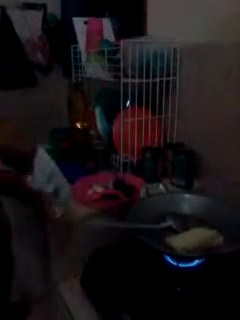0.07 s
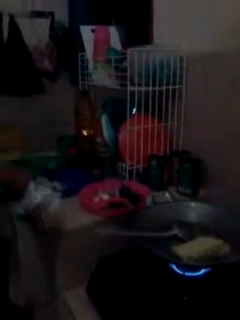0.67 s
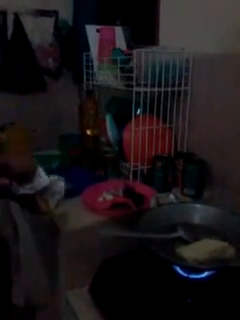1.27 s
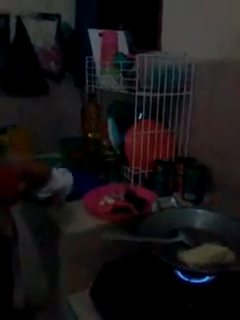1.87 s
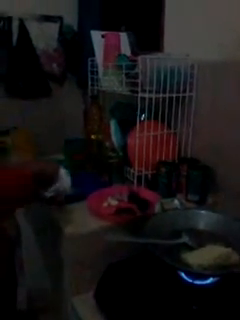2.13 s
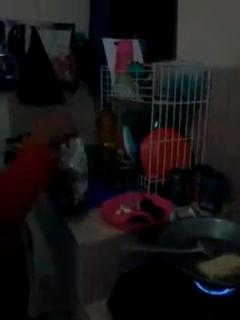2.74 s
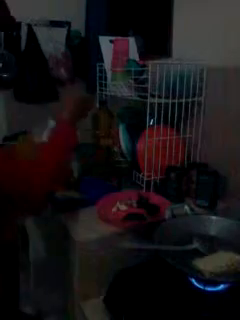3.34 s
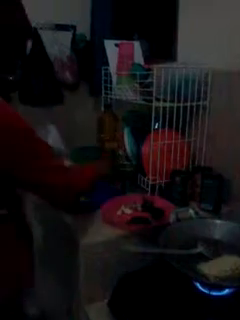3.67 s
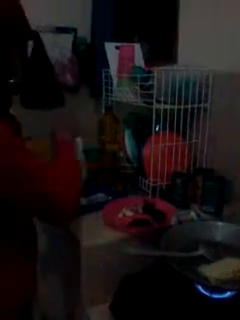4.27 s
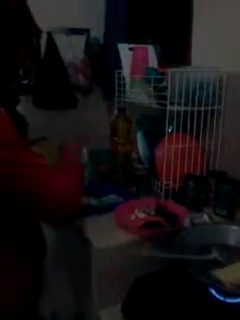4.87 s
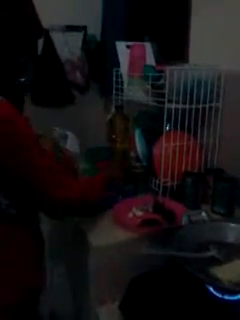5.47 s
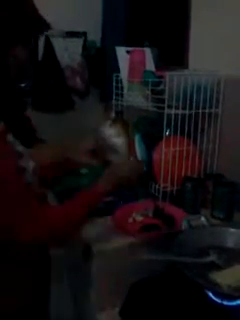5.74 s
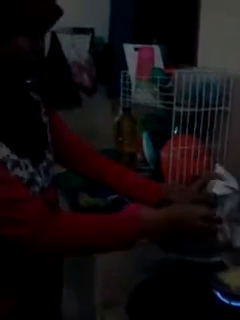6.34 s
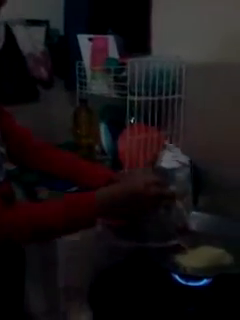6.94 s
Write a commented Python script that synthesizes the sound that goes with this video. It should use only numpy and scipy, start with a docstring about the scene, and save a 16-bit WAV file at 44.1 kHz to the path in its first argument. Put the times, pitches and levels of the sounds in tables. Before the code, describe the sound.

Someone picks open and shakes a crackly plastic bag while motorbikes drone outside and a pan sizzles faintly on a gas flame.

```python
"""Crackling and sharp snaps come first: a thin plastic bag is picked open, lifted and shaken out
in a small, hard-walled kitchen. Each stroke of the hand buckles its film in a shower of tiny clicks.
Motorbikes drone outside, their exhaust puffs muffled by the wall. The cook shifts about with soft
thuds, a pan sizzles faintly over a gas flame, and at the end something bumps the microphone."""
import sys
import numpy as np
from scipy import signal
from scipy.fft import rfft, irfft, next_fast_len
from scipy.io import wavfile
from scipy.ndimage import uniform_filter1d, map_coordinates

SR = 44100
rng = np.random.default_rng(int(sys.argv[2]) if len(sys.argv) > 2 else 0)


def output_pcm(signal):
    """Save a mono or channel-first signal as 16-bit PCM at the path in sys.argv[1].

    Samples are clipped to [-1, 1] before scaling.
    """
    pcm = np.clip(np.atleast_2d(signal).T, -1, 1) * 32767
    wavfile.write(sys.argv[1], SR, np.round(pcm).astype(np.int16))


N = 313110
TOP_HZ = 9076  # the highest pitch of a click, and the top of the whole sound

# The tone of the plastic film, from low to high: f/Hz, level/dB
FILM_TONE = [(120, -18.5), (260, -8.5), (390, -12), (480, -14.5), (950, -10.5), (1200, -10.5), (1400, -7.5),
             (2000, -5.5), (2550, -2.5), (3200, -2.5), (4400, 2.83), (5700, 0.5), (6800, -4.5),
             (9000, -24.5)]
def crinkle(rate=2700, crisp_db=-1.5, flex_db=-0.5, split_hz=2600, rub=0.62, fold_db=-8, fold_hz=1050):
    """Harder handling buckles more creases; big folds flex the sheet and push air, which sounds lower."""
    crisp, flex = handling()
    effort_db = crisp - crisp.max() + 10
    shower = clicks(rate * amp(.45 * effort_db), spread_db=2.0, ring_s=0.00031)
    power = np.abs(uniform_filter1d(shower ** 2, size=1100))
    shower = shower / np.sqrt(power + 0.0081)  # the creases share the hand's work
    sliding = rub * amp(-.3 * effort_db)  # gentle handling mostly slides film on film
    shower = (shower + sliding * rng.standard_normal(N)) / np.sqrt(1 + sliding ** 2)
    film = coloured(shower, lambda hz: amp(along(FILM_TONE, hz)))
    high = unit(coloured(film, lambda hz: (hz / split_hz) ** 4 / (1 + (hz / split_hz) ** 4)))
    low = unit(coloured(film, lambda hz: 1 / (1 + (hz / split_hz) ** 4)))
    folds = clicks(900, spread_db=3.5, ring_s=0.00054)
    folds = unit(coloured(folds, lambda hz: amp(along(FILM_TONE, hz)) / (1 + (hz / fold_hz) ** 6)))
    slack_db = np.clip(flex - crisp + 4, -12, 3)  # a slack sheet flaps more than it crackles
    return amp(crisp + crisp_db) * high + amp(flex + flex_db) * low + amp(flex + slack_db + fold_db) * folds


RELEASE_DB_PER_S = 190  # how fast the rustle dies when the hand stops
# Each grip, pull or shake: start t/s, length/s, crackle level/dB, flexing compared with crackle/dB
HAND_STROKES = [(0.035, 0.066, -37, -3), (0.162, .09, -38, -5.5), (0.264, 0.074, -37, -8.5),
                (0.449, 0.014, -43, -19), (0.59, 0.08, -37, -6.5), (0.708, 0.058, -36.5, -8),
                (0.847, 0.057, -38.5, -5), (0.935, .02, -39.5, -6.5), (1.041, .09, -46.5, -11),
                (1.252, 0.041, -43, -21), (1.335, 0.11, -48.5, -9), (1.52, .085, -45, -5.5),
                (1.643, .055, -39.5, -7), (1.772, 0.075, -41, -10.5), (1.907, 0.092, -44.5, -6.5),
                (2.079, 0.13, -51.5, -3), (2.234, 0.14, -41, -5.5), (2.446, .1, -38, -6),
                (2.555, .11, -33, -4.5), (2.721, 0.074, -47, -2), (3.021, .018, -47, -1),
                (3.328, 0.068, -65.5, -2.5), (3.725, .09, -62, -1.5), (3.838, .045, -47.5, -7),
                (4.005, 0.038, -54.5, -6.5), (4.254, .02, -49, -4), (4.28, .02, -44, -2),
                (4.325, 0.08, -40.5, -5), (4.434, 0.093, -39.5, -4), (4.596, 0.089, -43, -7),
                (4.711, 0.044, -38, -5), (4.774, 0.063, -41, -3), (4.867, 0.034, -37, -7),
                (4.996, 0.019, -50, -16), (5.414, .08, -56.5, -5.5), (5.517, .02, -50, -4),
                (5.637, 0.059, -58.5, -8), (5.796, 0.028, -61, -3), (5.925, .16, -52.5, -3.5),
                (6.106, .05, -41.5, -1), (6.135, 0.099, -33.8, -10), (6.258, .03, -35, -12),
                (6.331, .07, -42.5, -20), (6.492, 0.021, -51.5, -6), (7.006, 0.051, -54.5, -3.5),
                (7.078, 0.019, -46, -1)]
def handling(picking_end_s=2.0, picking_db=-52, picking_flex_db=-2.5, fade_db_per_s=2.5, uneven_db=1.0):
    """Crackle and flexing levels in dB: the hand's strokes, plus steady picking until the bag is open."""
    left_s = picking_end_s - np.arange(N) / SR
    easing_db = np.minimum(fade_db_per_s * left_s, RELEASE_DB_PER_S * left_s)  # the bag comes loose
    crisp = amp(picking_db + easing_db) ** 2
    flex = crisp * amp(picking_flex_db) ** 2
    for start, length, db, flex_db in HAND_STROKES:
        power = (amp(db) * stroke(start, length)) ** 2
        crisp += power
        flex += power * amp(flex_db) ** 2
    catching_db = uneven_db * wobble(35)  # the film catches and gives under the fingers
    return 10 * np.log10(np.array([crisp, flex]) + 1e-9) + catching_db


def stroke(start, length, swell_share=.35, settle_db=-19, settle_db_per_s=65):
    """One move of the hand swells, holds and dies away; the crumpled film goes on relaxing faintly."""
    t = np.arange(N) / SR - start
    after = np.maximum(t - length, 0)
    release = np.maximum(amp(-RELEASE_DB_PER_S * after), amp(settle_db - settle_db_per_s * after))
    return np.clip(t / (swell_share * length), 0, 1) * release


SNAP_HZ = 4490  # the typical pitch of a crease
# Single creases that pop through: t/s, level/dB (before snap_db is added)
CREASE_SNAPS = [(0.037, -20.5), (0.0467, -17), (0.0582, -21.5), (0.0835, -18.5), (0.3714, -28),
                (0.4504, -10.5), (0.945, -32.5), (1.16, -29), (1.259, -28), (1.27, -26), (1.3468, -24),
                (1.379, -23.5), (1.432, -28), (1.5035, -25), (1.6553, -22), (1.671, -25), (1.779, -21.5),
                (2.222, -20.5), (2.31, -26), (2.3409, -22), (2.4444, -23), (2.4678, -17), (2.493, -23),
                (2.6521, -19.5), (2.7419, -29), (3.0286, -40), (3.852, -35), (4.2574, -39), (4.284, -28.5),
                (4.6658, -23.5), (5.008, -40), (5.529, -38.5), (5.697, -47.5), (6.272, -18.5), (6.356, -31),
                (6.505, -38), (7.089, -35.5)]
def snaps(snap_db=-2.0, scatter=0.025, ring_s=0.00045, crack=0.18, shiver_db=-30, shiver_s=0.023):
    """A crease snaps through, rings for a few cycles and sets the film around it shivering."""
    out, t = np.zeros(N + SR), np.arange(SR // 10) / SR
    film_noise = unit(coloured(rng.standard_normal(N), lambda hz: amp(along(FILM_TONE, hz))))
    loudest_db = max(db for _, db in CREASE_SNAPS)
    for s, db in CREASE_SNAPS:
        hz = SNAP_HZ * (1 + scatter * rng.standard_normal())
        age = 2 * t / (ring_s * amp(0.23 * (loudest_db - db)))  # a softer snap rings longer
        start = rng.integers(N - len(t))
        grit = film_noise[start:start + len(t)]
        ring = age * np.exp(1 - age) * (np.sin(2 * np.pi * hz * t) + crack * grit)
        shiver = amp(shiver_db + 0.55 * db) * np.exp(-t / shiver_s) * grit
        out[round(s * SR):][:len(t)] += amp(db + snap_db) * ring + shiver
    return out[:N]


def ticks(rate=70, tick_db=-11, width_hz=1400):
    """Small creases snap at random while the bag is handled and stand out of its crackle."""
    crisp_db = handling()[0]
    creases = clicks(rate, spread_db=1.5, ring_s=0.00088)
    ringing = coloured(creases, lambda hz: 1 / (1 + ((hz - SNAP_HZ) / width_hz) ** 4))
    return amp(crisp_db + tick_db) * unit(ringing)


# Moments when the puffed-up bag sounds hollow: start t/s, length/s, f/Hz, level/dB
AIR_POCKETS = [(0.59, .15, 1010, -52), (4.76, 0.12, 479, -53.5), (4.74, 0.13, 800, -55),
               (6.108, .11, 900, -48)]
def hollows(width=.11):
    """The rustle makes the air in the bag ring in a narrow band; width is a share of its pitch."""
    out = np.zeros(N)
    for start, length, pitch, db in AIR_POCKETS:
        ring = coloured(rng.standard_normal(N), lambda hz: 1 / (1 + ((hz / pitch - 1) / width) ** 2))
        out += amp(db) * stroke(start, length) * unit(ring)
    return out


def bump(at_s=7.045, db=-24, push_s=0.00053, thud_db=-17, thud_hz=112, thud_s=0.032):
    """A soft knock on the microphone's case: one push and rebound, then a low shudder."""
    t = np.maximum(np.arange(N) / SR - at_s, 0)
    age = t / push_s
    push = age * (2 - age) * np.exp(-age) * (1 - np.exp(-4 * age ** 2))
    shudder = amp(thud_db) * np.exp(-t / thud_s) * np.sin(2 * np.pi * thud_hz * t)
    return amp(db) * (shudder - push / np.abs(push).max())


# The nearer and the farther engine: t/s, firing rate f/Hz, indoor level/dB
NEAR_ENGINE = [(0, 41, -53), (.4, 41.5, -51.5), (1.2, 42.2, -51), (2.4, 47.2, -62.5), (2.6, 40.3, -57),
               (2.87, 40, -47), (3.3, 42.4, -65), (3.65, 40.6, -64), (3.82, 41.4, -57), (4.2, 44.3, -62.5),
               (4.68, 43, -62), (4.88, 42.4, -53.5), (5.17, 43, -57), (5.3, 41, -72), (6.7, 40, -70.5),
               (7.05, 45.7, -52)]
FAR_ENGINE = [(0, 53.5, -49), (1.15, 54.8, -53), (1.4, 63.2, -48.5), (2.1, 73.6, -56.5), (2.7, 52.4, -49.5),
              (3.4, 64.6, -64.5), (4.1, 55, -55), (4.35, 56.7, -60), (4.7, 67, -57), (5.3, 64, -70.5),
              (6.15, 57, -56), (6.7, 61, -74)]
def motorbikes():
    """Two engines pull through their gears along the street, rising and falling in pitch and level."""
    near_hz, near_db = curves(NEAR_ENGINE)
    far_hz, far_db = curves(FAR_ENGINE)
    near = amp(near_db + 1.2 * wobble(5.0)) * exhaust(near_hz, waver=0.0046, rough=0.33)
    far = amp(far_db + 0.58 * wobble(2.2)) * exhaust(far_hz, waver=.008, rough=0.66)
    return near + far


# The tone of an exhaust heard through the wall: f/Hz, level/dB
MUFFLED_TONE = [(20, -22), (42, -9), (65, -15.5), (85, 4), (130, 2.5), (165, -2.5), (205, -10.5), (300, -8),
                (400, -17.5), (700, -44), (1500, -101.5)]
def exhaust(firing_hz, waver, rough):
    """Each firing of the engine gives one puff, of uneven strength and dulled by the wall."""
    firings = np.cumsum(firing_hz * (1 + waver * wobble(7))) / SR
    puffs = np.diff(np.floor(firings), prepend=0) * (1 + rough * rng.standard_normal(N))
    return unit(coloured(puffs, lambda hz: amp(along(MUFFLED_TONE, hz))))


# Soft thuds as the cook shifts about: t/s, level/dB (before thud_db is added)
COOK_THUDS = [(3.504, -44), (3.783, -45), (4.355, -44), (5.129, -41), (5.369, -46.5), (5.645, -45)]
def thuds(thud_db=-5, thud_hz=125, swell_s=0.015):
    """Each soft blow makes the room boom briefly, at an unsteady low pitch."""
    t, swell = np.arange(N) / SR, np.zeros(N)
    for s, db in COOK_THUDS:
        age = np.maximum(t - s, 0) / swell_s
        swell += amp(db + thud_db) * age * np.exp(1 - age)
    return swell * np.sin(2 * np.pi * thud_hz * t + 2.05 * wobble(70))


# The tone of the flame and the pan together: f/Hz, level/dB
STOVE_TONE = [(20, 3.5), (40, 8.5), (70, -4.5), (130, -1), (300, -4.5), (450, -14.5), (700, -20),
              (1000, -18), (1350, -21), (1900, -22), (2550, -16.5), (3300, -16.5), (4500, -16), (6500, -18),
              (9000, -44.5)]
def stove(level_db=-60, spit=0.24):
    """The gas flame rushes softly, with fine spitting from the oil."""
    fizz = rng.standard_normal(N) + spit * clicks(400, spread_db=1.5, ring_s=0.00018)
    sizzle = unit(coloured(fizz, lambda hz: amp(along(STOVE_TONE, hz))))
    return amp(level_db + 0.29 * wobble(3.8)) * sizzle


# How long the kitchen's echo lasts: f/Hz, time to fade by 60 dB t/s
ECHO_TIMES = [(150, 0.58), (1000, 0.68), (4000, 0.55), (8000, 0.54)]
def kitchen(x, room_db, counter=0.3, counter_s=.0013):
    """The counter top echoes at once, the walls with a short dense tail that changes as the bag moves."""
    out, hop = np.zeros(N + SR), SR // 8
    for start in range(0, N, hop):
        hz, t, noise = signal.stft(rng.standard_normal(SR // 2), SR, nperseg=256)
        fade = amp(-60 * t / along(ECHO_TIMES, hz)[:, None])
        tail = signal.istft(noise * fade, SR, nperseg=256)[1]
        echo = amp(room_db) * np.pad(tail / np.linalg.norm(tail), (SR // 300, 0))
        echo[0] = 1  # the direct sound
        echo[round(counter_s * SR * rng.uniform(.5, 2))] += counter
        heard = signal.fftconvolve(x[start:start + hop], echo / np.linalg.norm(echo))
        out[start:start + len(heard)] += heard
    return out[:N]


def clicks(rate, spread_db, ring_s):
    """Random clicks of uneven size, about rate a second, each a brief ring at its own pitch."""
    at = np.flatnonzero(rng.random(N) < rate / SR)
    pitch, chance, phase = rng.random((len(at), 3)).T[:, :, None]
    t = np.arange(SR // 250) / SR
    size = amp(spread_db * np.minimum(-np.log(1 - chance), 4))  # many small, a few big
    rings = size * np.exp(-t / ring_s) * np.cos(2 * np.pi * (pitch * TOP_HZ * t + phase))
    samples = at[:, None] + np.arange(len(t))
    return unit(np.bincount(samples.ravel(), rings.ravel(), N)[:N])


def coloured(x, gain):
    """Change the tone of x: gain(hz) says how much of each frequency gets through."""
    m = 2 * next_fast_len(N // 2 + SR // 4)
    hz = np.fft.rfftfreq(m, 1 / SR)
    cepstrum = irfft(np.log(np.maximum(gain(hz), 1e-6)))
    cepstrum[1:m // 2] *= 2
    cepstrum[m // 2 + 1:] = 0  # so ringing comes after a click, never before
    return irfft(rfft(x, m) * np.exp(rfft(cepstrum)), m)[:N]


def wobble(rate):
    """A smooth curve through rate random points a second."""
    return map_coordinates(rng.standard_normal(int(N * rate / SR) + 4), [np.arange(N) * rate / SR])


def curves(rows):
    """One value per sample for each column after the time."""
    s, *columns = np.transpose(rows)
    return [np.interp(np.arange(N) / SR, s, column) for column in columns]


def along(points, hz):
    """Read between the rows of a (frequency, value) table, on a log scale of frequency."""
    freqs, values = np.transpose(points)
    return np.interp(np.log(hz + 1), np.log(freqs + 1), values)


def amp(db):
    """Turn decibels into a factor to multiply by."""
    return 10 ** (np.asarray(db) / 20)


def unit(x):
    """Scale x to an average power of 1."""
    return x / np.sqrt(np.mean(x ** 2) + 1e-20)


def scene():
    """Snaps beam straight at the microphone; the broad rustle fills more of the room."""
    bag = kitchen(crinkle() + hollows(), room_db=-3.5) + kitchen(snaps() + ticks(), room_db=-7.5)
    return (bag + motorbikes() + stove() + thuds() + bump())[None]


def record(dry, knee_hz=7500, shelf_db=-12):
    """The microphone dulls the treble above knee_hz and passes nothing above TOP_HZ."""
    m = next_fast_len(N + SR // 2)
    hz = np.fft.rfftfreq(m, 1 / SR)
    dulling = amp(np.interp(hz, [knee_hz, knee_hz + 350], [0, shelf_db]))
    cutoff = np.clip((TOP_HZ - hz) / 400, 0, 1)
    return irfft(rfft(dry, m) * dulling * cutoff, m)[:, :N]


dry = scene()
out = record(dry)
output_pcm(out)
```